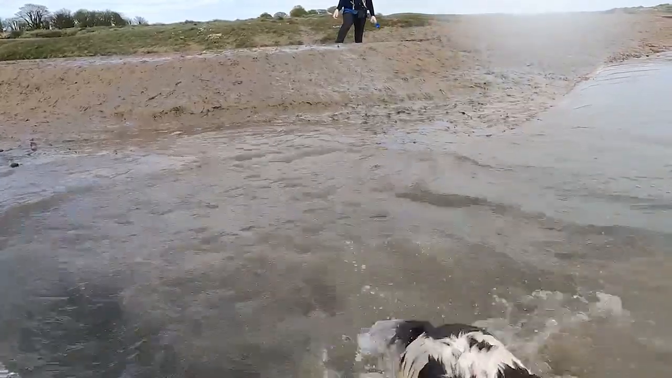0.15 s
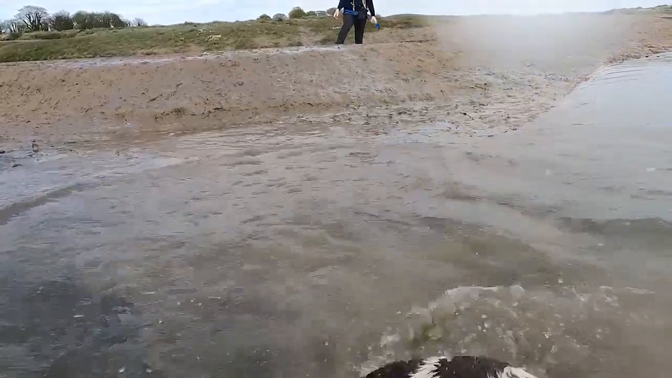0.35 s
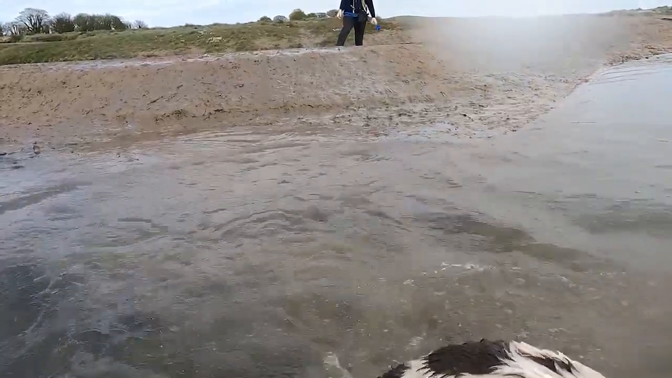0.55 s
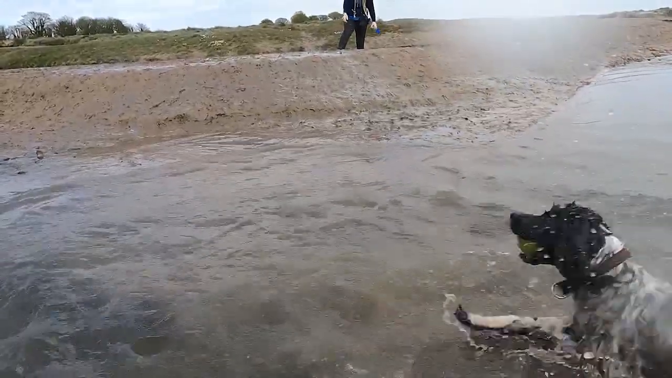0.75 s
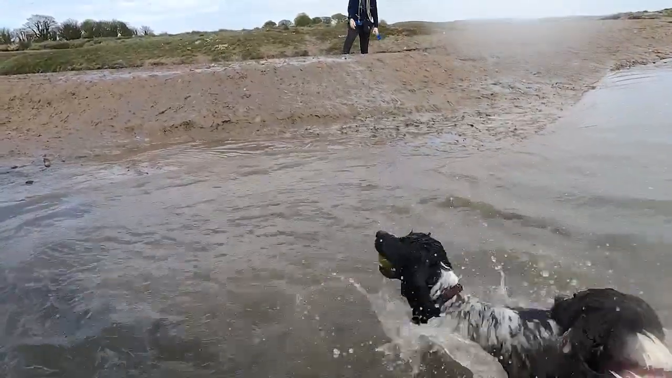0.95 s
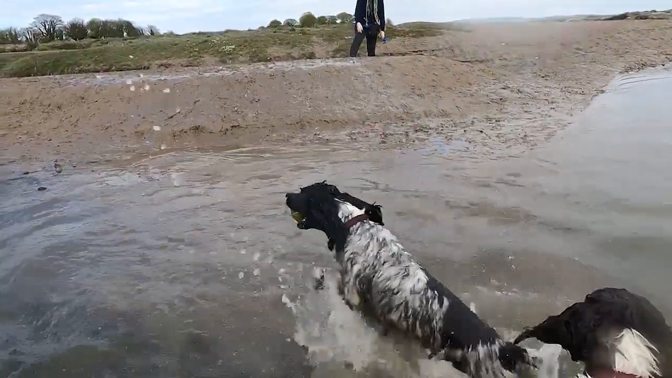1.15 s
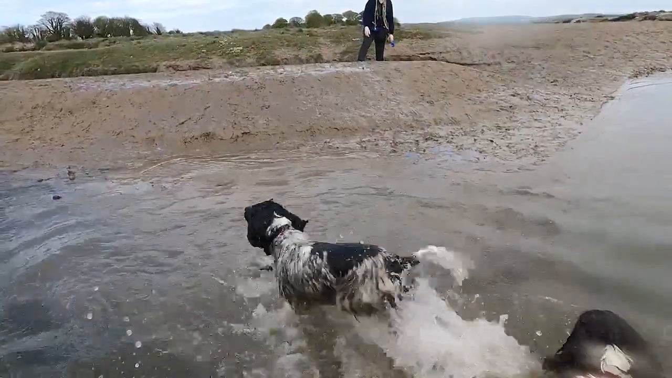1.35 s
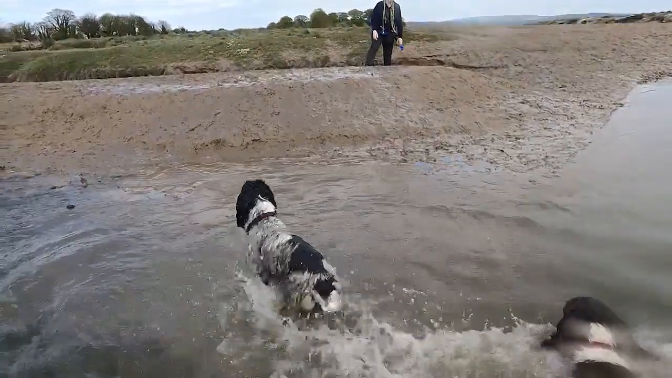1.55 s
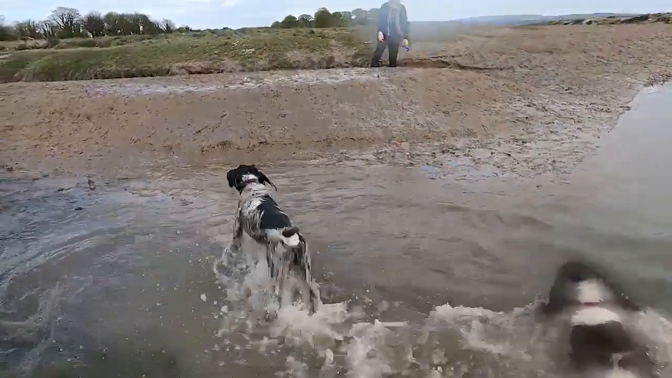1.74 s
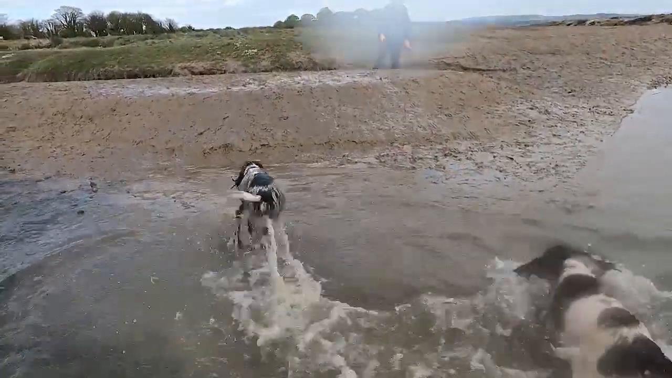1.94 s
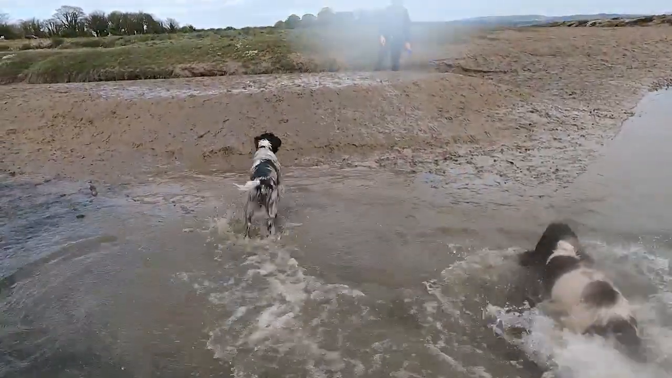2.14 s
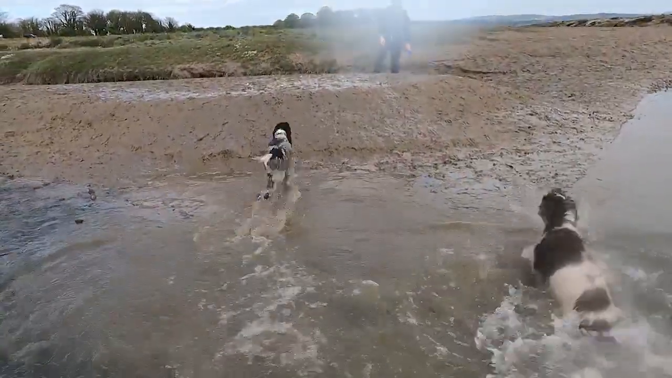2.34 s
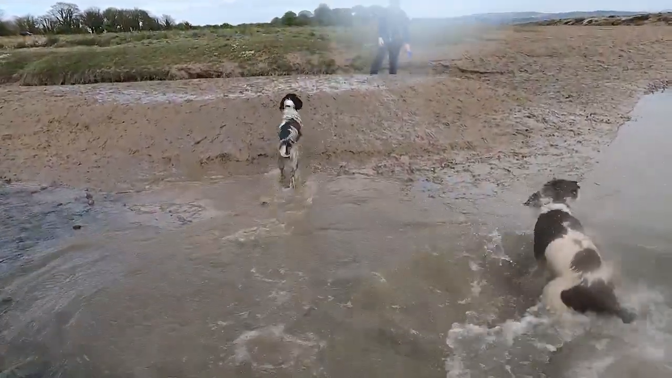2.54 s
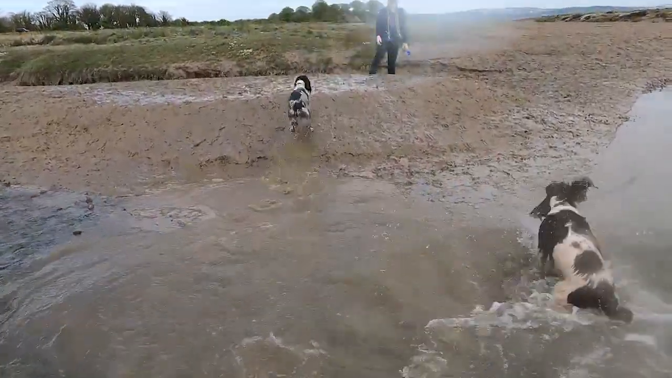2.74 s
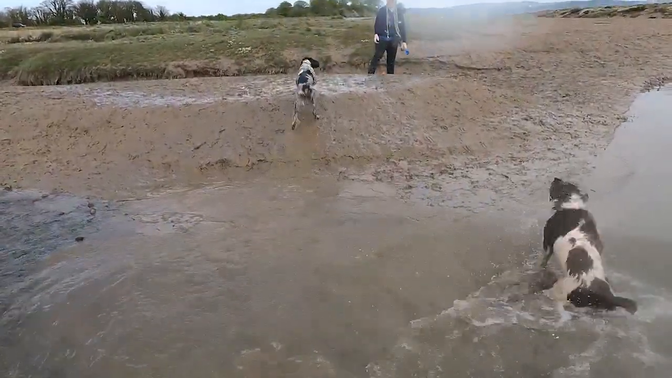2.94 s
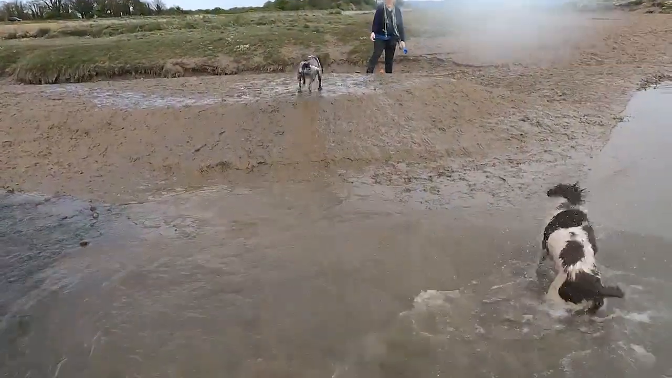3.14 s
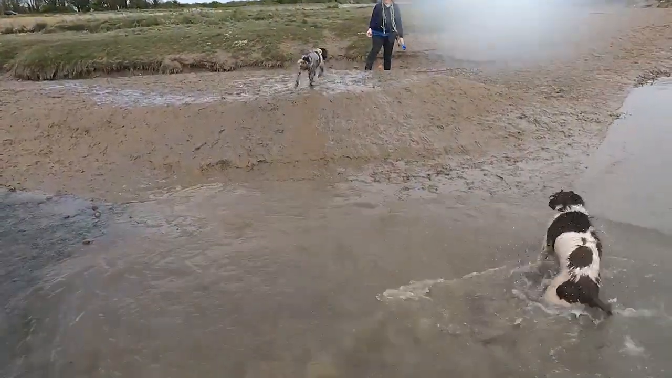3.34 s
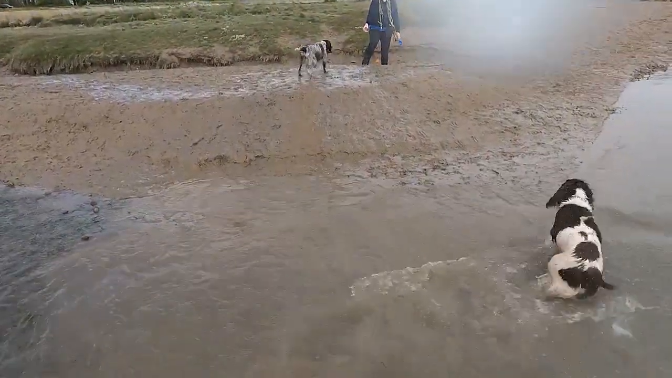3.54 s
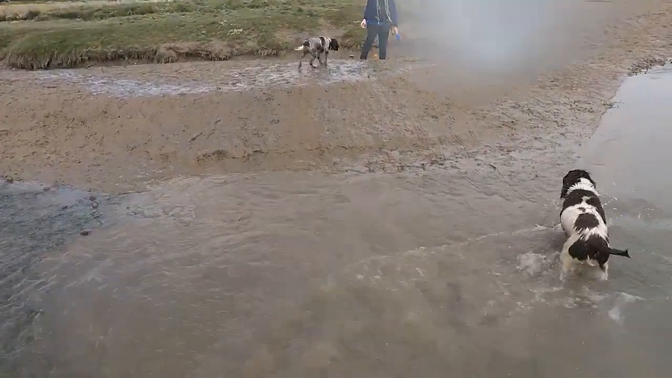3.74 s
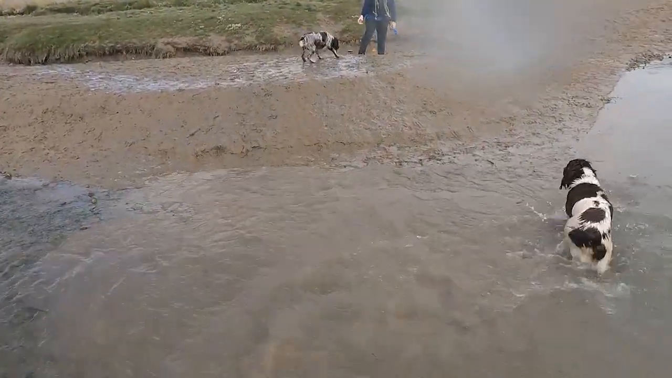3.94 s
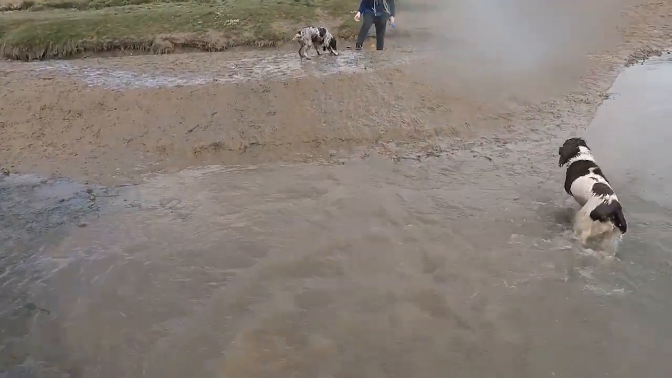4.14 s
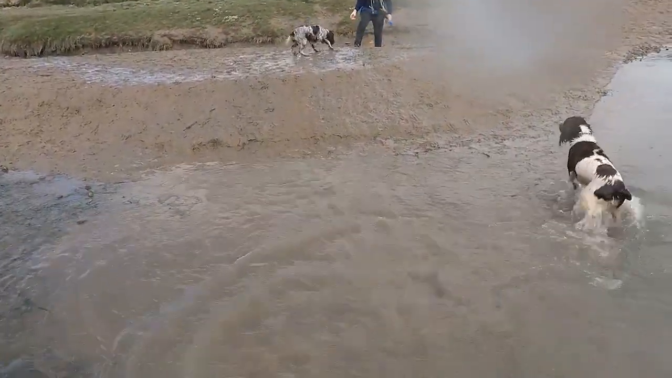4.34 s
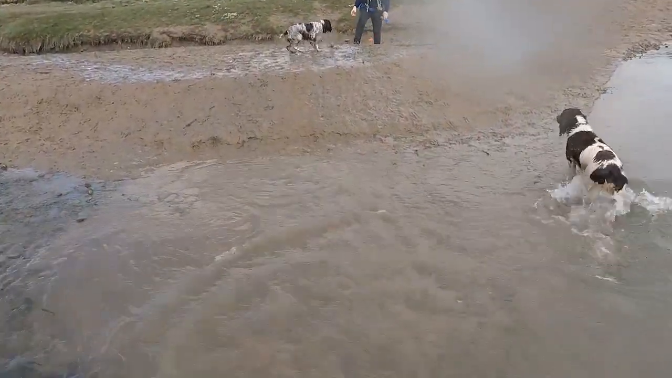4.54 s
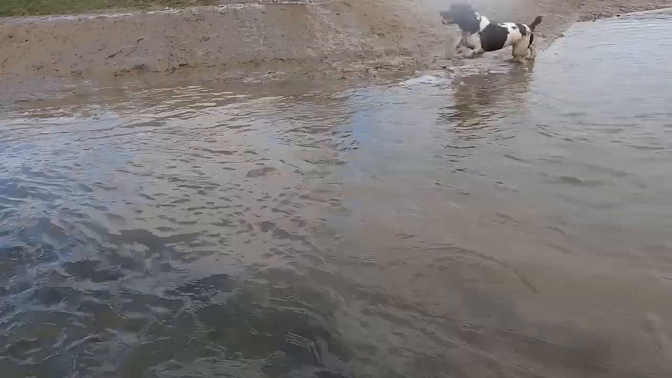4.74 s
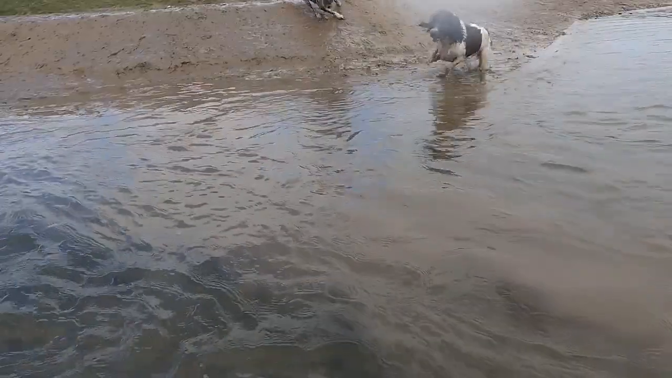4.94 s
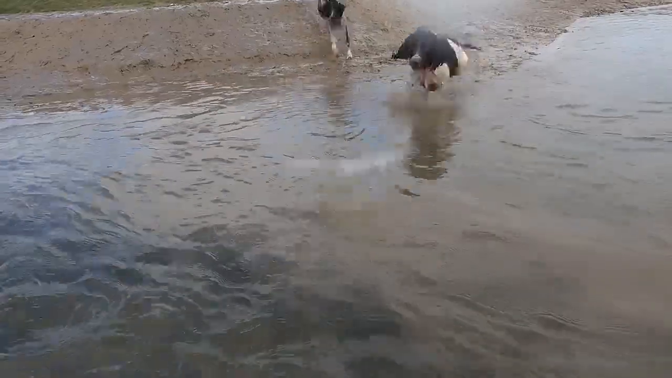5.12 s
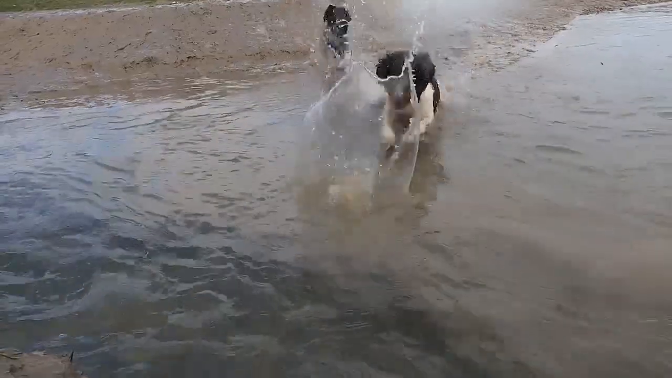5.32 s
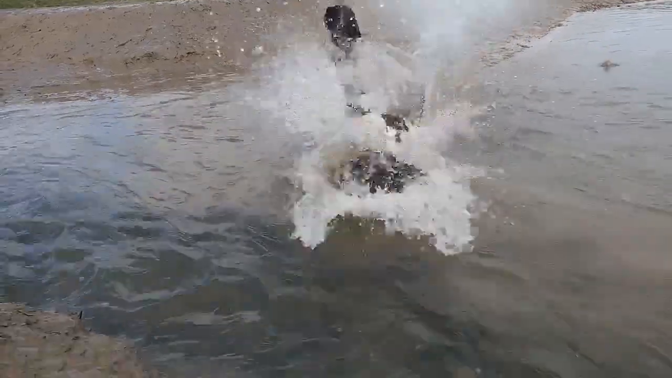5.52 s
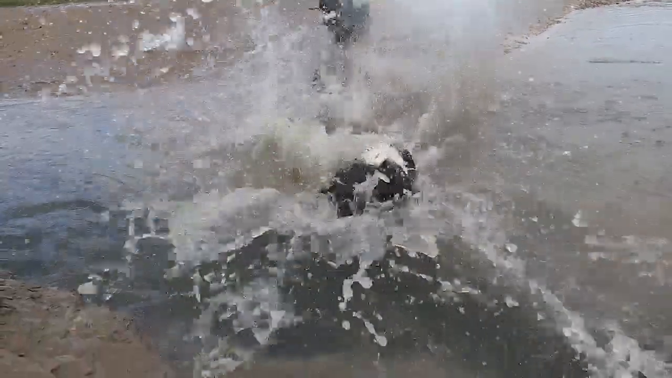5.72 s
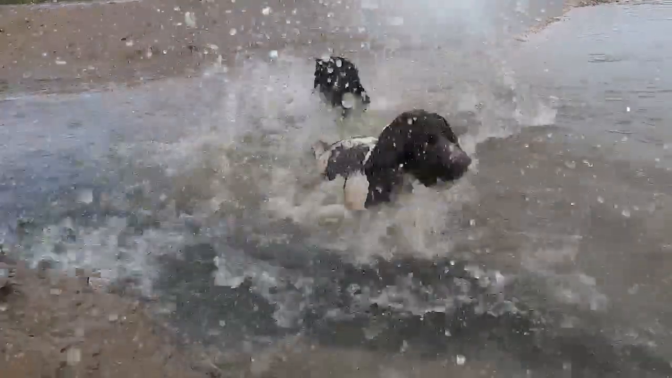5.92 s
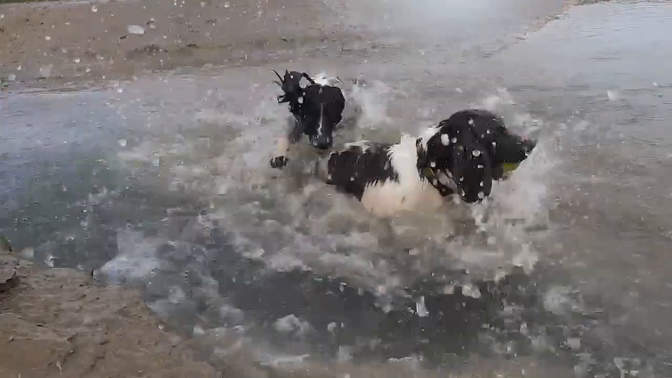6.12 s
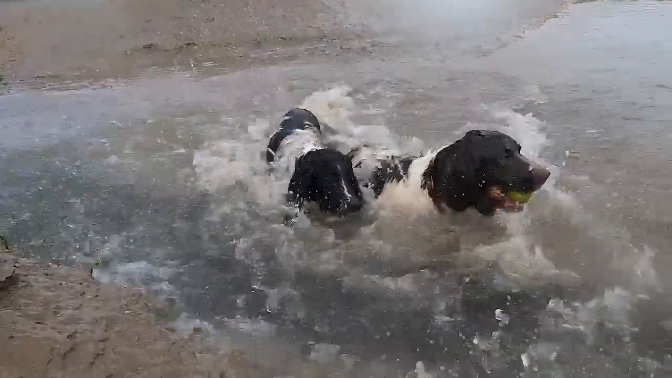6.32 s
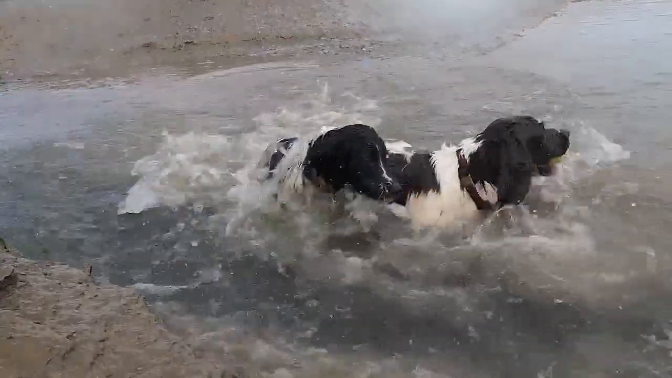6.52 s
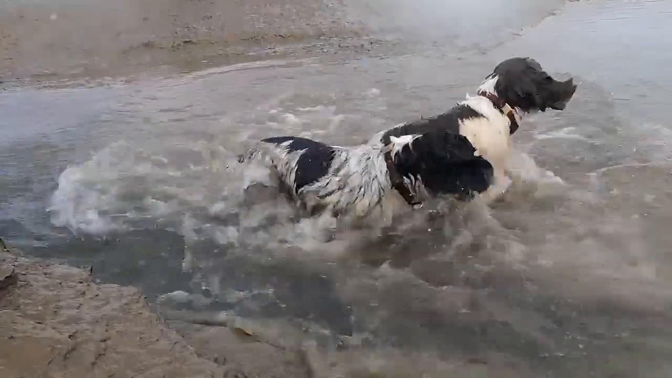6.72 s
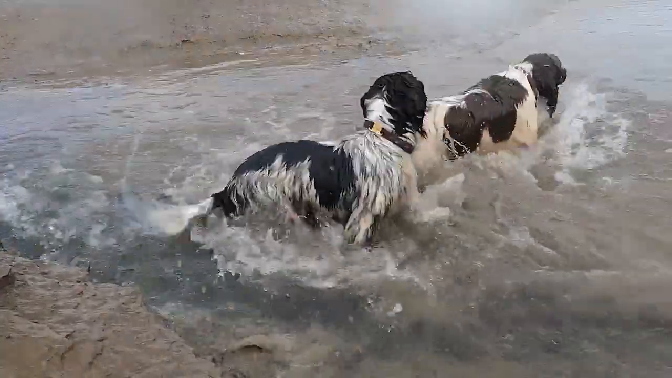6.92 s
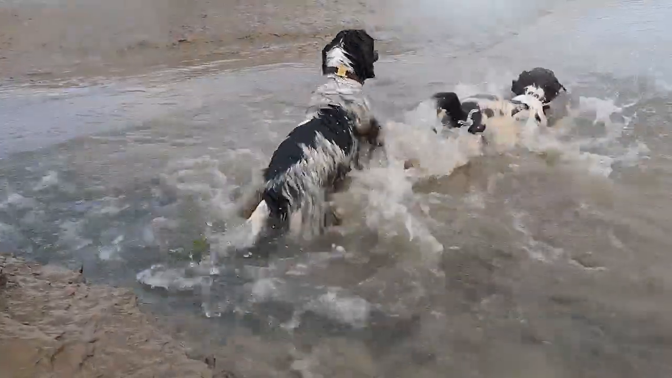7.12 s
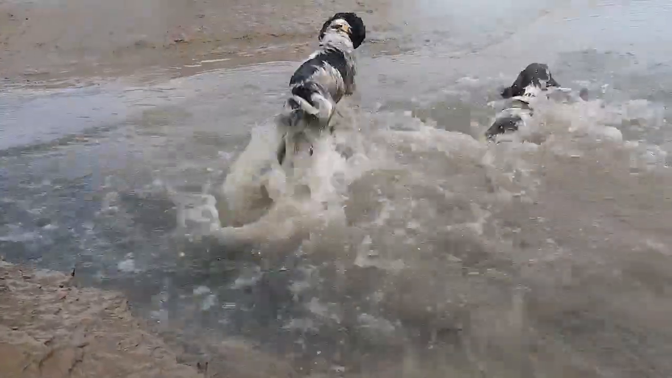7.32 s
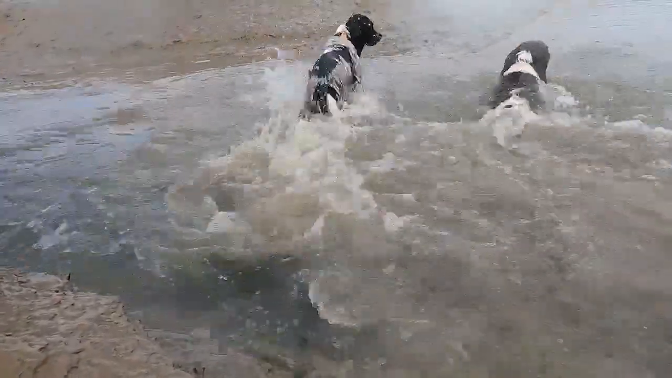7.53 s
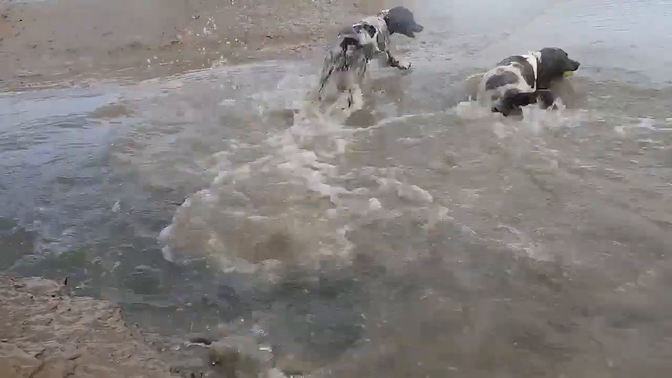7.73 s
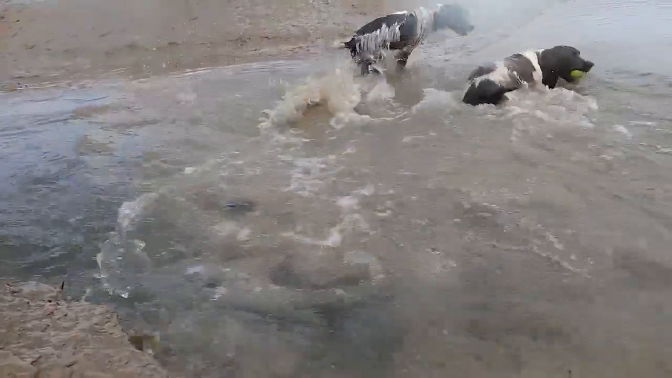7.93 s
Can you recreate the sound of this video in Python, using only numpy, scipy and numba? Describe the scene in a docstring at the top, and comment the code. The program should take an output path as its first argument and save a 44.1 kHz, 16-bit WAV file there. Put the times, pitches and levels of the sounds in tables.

```python
"""Two dogs splashing in muddy shallows

Two dogs bound and wade close by: a gurgling wash of air pockets, bubbles, drops, spray and mist,
each layer a swarm of decaying sines, lifted by lunges and throws. Loud lone bubbles and paw slaps
(crack, plink, droplets) sit on top; filtered noise makes the far lapping and a low hum beneath.
The sound breaks off briefly, then a dog gallops in from the bank and plunges."""
import sys
import numpy as np
from scipy import signal
from scipy.fft import rfft, irfft, next_fast_len
from scipy.io import wavfile
from scipy.ndimage import uniform_filter1d
from numba import njit

SR = 44100
rng = np.random.default_rng(int(sys.argv[2]) if len(sys.argv) > 2 else 0)


def dump(signal):
    """Clip the signal to [-1, 1] and save it as 16-bit WAV at the path in sys.argv[1]."""
    limited = np.clip(np.atleast_2d(signal).T, -1, 1)
    pcm = np.round(limited * 32767).astype(np.int16)
    wavfile.write(sys.argv[1], SR, pcm)


N = 351477


def from_db(db):
    """Decibels to gain."""
    return 10 ** (np.asarray(db) / 20)


def rms_one(x):
    """Scale to rms 1."""
    return x / np.sqrt(np.mean(x ** 2) + 1e-20)


def in_time(rows):
    """Automation curves: the columns of a table at every sample."""
    time_s, *columns = np.transpose(rows)
    return [np.interp(np.arange(N) / SR, time_s, column) for column in columns]


def drift(corner_hz):
    """Slow random modulation: noise through two equal one-pole low-passes, rms 1."""
    step = 40   # samples between drawn points
    pole = np.exp(-2 * np.pi * step * corner_hz / SR)
    noise = rng.standard_normal(N // step + 2002)
    slow = signal.lfilter([1], [1, -2 * pole, pole ** 2], noise)[2000:]   # skip the run-in
    return np.interp(np.arange(N) / step, np.arange(len(slow)), rms_one(slow))


def colour(x, points, low_hz=20, high_hz=20000, flatten=False):
    """EQ x along points between two soft edges; flatten first evens out its own spectrum."""
    size = next_fast_len(N)
    spectrum = rfft(x, size)
    hz = np.arange(size // 2 + 1) * SR / size + 1   # the 1 keeps the logarithm finite
    if flatten:
        power = uniform_filter1d(np.abs(spectrum) ** 2, size=801)
        spectrum = spectrum / np.sqrt(power + 1e-12)
    point_hz, point_db = np.transpose(points)
    gain = from_db(np.interp(np.log(hz), np.log(point_hz), point_db))
    edges = np.sqrt((1 + (low_hz / hz) ** 6) * (1 + (hz / high_hz) ** 6))
    return irfft(spectrum * gain / edges, size)[:N]


# Far lapping, spectrum before levelling: freq_hz, density_db (per Hz)
LAPPING_SPECTRUM = [(35, -37), (60, -14), (141, -6), (185, -7), (913, -16), (1370, -39), (4220, -12),
                    (13000, -33)]
HISS_DB = -51.5   # rms
HUM_HZ, HUM_WIDTH_HZ, HUM_DB = 132, 16, -58.5   # rms


def background():
    """Far lapping as soft shaped noise, and noise through a narrow resonance as a wavering hum."""
    radius = np.exp(-np.pi * HUM_WIDTH_HZ / SR)
    angle = 2 * np.pi * HUM_HZ / SR
    resonance = [1, -2 * radius * np.cos(angle), radius ** 2]
    hum = signal.lfilter([1, 0, -1], resonance, rng.standard_normal(N))
    hiss = colour(rng.standard_normal(N), LAPPING_SPECTRUM)
    return from_db(HUM_DB) * rms_one(hum) + from_db(HISS_DB) * rms_one(hiss)


@njit
def add(out, start, height, hz, cycles, rise, swell, sr):
    """Each bubble swells over some turns and dies in its cycles, rising in pitch near the surface."""
    for k in range(len(start)):
        period = sr / hz[k]
        for i in range(min(int(cycles[k] * period), len(out) - start[k])):
            turns = i / period
            age = turns / cycles[k]
            size = min(turns / swell[k], 1.0) * np.exp(-5 * age)
            phase = 2 * np.pi * turns * (1 + rise * age / 2)
            out[start[k] + i] += height[k] * size * np.sin(phase)
    return out


def births(per_s, spread_db, clump_db):
    """Random onsets with random sign, a few much louder; clump_db makes neighbours swell together."""
    start = np.flatnonzero(rng.random(N) < per_s / SR)
    size_db = spread_db * np.minimum(rng.exponential(1, len(start)), 4) + clump_db[start]
    return start, from_db(size_db) * rng.choice([-1., 1.], len(start))


# Water through the sealed microphone port, spectrum before levelling: freq_hz, density_db (per Hz)
WATER_SPECTRUM = [(29, -60), (50, -45.5), (178, -4.5), (313, -1.5), (551, 2), (650, -8), (1170, -6),
                  (2610, -7), (4080, -9.5), (7170, -21.5), (8260, -30), (9070, -39), (10200, -30),
                  (11000, -30.5), (13900, -51.5)]


def swarm(per_s, low_hz, high_hz, cycles, spread_db, clump_db, rise=0.458):
    """Bubbles spread evenly in log pitch over one size range, coloured by the water; rms 1."""
    start, height = births(per_s, spread_db, clump_db)
    pitch, life = rng.random((2, len(start)))
    hz = low_hz * 0.6877 * (2 * high_hz / low_hz) ** pitch   # spills past both edges
    rings = add(np.zeros(N), start, height, hz, cycles * (.5 + life), rise, np.ones(len(hz)), SR)
    return rms_one(colour(rings, WATER_SPECTRUM, low_hz, high_hz, flatten=True))


# Usual bubble pitch, higher in the shallows: time_s, pitch_hz
USUAL_PITCH = [(0, 730), (.8, 688), (1.4, 626), (2.85, 662), (3.1, 832), (3.9, 793), (4.6, 846),
               (4.75, 643), (5.05, 1000), (5.45, 960), (5.62, 644), (6.05, 657), (6.35, 810), (6.65, 629),
               (7.3, 690), (7.55, 810), (7.8, 650), (7.97, 750)]


def froth(per_s, octaves, cycles, spread_db, clump_db):
    """The gurgle: bubbles whose sizes gather round the usual one; rms 1."""
    usual_hz, = in_time(USUAL_PITCH)
    start, height = births(per_s, spread_db, clump_db)
    ratio = 2 ** (octaves * rng.standard_normal(len(start)))
    hz = usual_hz[start] * ratio
    lives = cycles * (.5 + rng.random(len(start)))
    return rms_one(add(np.zeros(N), start, height * np.sqrt(ratio), hz, lives, .1, 0.081 * lives, SR))


def bursts(rows, shape):
    """Power of two layers over time, one envelope per row."""
    power, age_s = np.zeros((2, N + SR)), np.arange(SR // 2) / SR
    for start_s, first_db, second_db, length_s in rows:
        at = int(start_s * SR)
        gains = from_db([[first_db], [second_db]])
        power[:, at:at + len(age_s)] += (gains * shape(age_s, length_s)) ** 2
    return power[:, :N]


# Steady wash round the dogs: time_s, bubbles_db, pockets_over_bubbles_db, spray_db
WASH_CURVES = [(0, -27.5, -7, -25.5), (.3, -26.5, -18, -31), (.7, -30, -17, -31), (.8, -24, -12.5, -26),
               (1.25, -23.5, -9, -29), (1.7, -24, -5, -26.5), (2.2, -25, -11.5, -29),
               (2.87, -30.5, -20, -31.5), (3.28, -39.5, -9, -36), (3.6, -37.5, -28, -39),
               (4.0, -30, -14, -35), (4.15, -29, -16, -36), (4.47, -32, -3, -36.5),
               (4.75, -32.5, -10, -33.5), (4.8, -60, -8, -53), (5.0, -65, 2, -67), (5.28, -53, -2, -50),
               (5.55, -38, -15, -30), (5.62, -25, 2, -28), (5.83, -29, 1, -26), (6.03, -25, -0.5, -21.5),
               (6.42, -28, -5.5, -24.5), (6.6, -29, -2, -33), (6.82, -27.5, -6, -33.5),
               (7.2, -22, -4.5, -27.5), (7.55, -23.5, -12, -29), (7.75, -25.5, -5, -32),
               (7.97, -26, -10, -30.5)]
MIST_DB, MIST_SWING = -40, 1.07   # wash mist when its spray is at -30.5 dB; dB of mist per dB of spray
DROPS_FROM_BUBBLES_DB, DROPS_FROM_SPRAY_DB = -4.5, -1.5


def churning():
    """Five bubble sizes; a shared surge swells them together, with faster patter on the small ones."""
    wash_db, depth_db, sheet_db = in_time(WASH_CURVES)
    pushed, trapped = bursts(LUNGE_EVENTS, lunge)
    thrown, misted = bursts(THROW_EVENTS, throw)

    # Layer gains: wash and bursts add as power
    bubbly = np.sqrt(from_db(wash_db) ** 2 + pushed)
    hollow = np.sqrt(from_db(wash_db + depth_db) ** 2 + trapped)
    sprayed = np.sqrt(from_db(sheet_db) ** 2 + thrown)
    mist_db = MIST_SWING * (sheet_db + 30.5) + MIST_DB
    misty = np.sqrt(from_db(mist_db) ** 2 + misted)
    dripping = np.hypot(from_db(DROPS_FROM_BUBBLES_DB) * bubbly, from_db(DROPS_FROM_SPRAY_DB) * sprayed)

    surge, patter = drift(19.5), drift(32)
    pockets = swarm(400, 77.7, 418, 6.4, 2.2, 0.79 * surge + 1.24 * drift(11))
    bubbles = froth(700, 0.342, 16.4, 2.16, 1.33 * surge + 0.97 * drift(38))
    drops = swarm(1100, 1057.5, 2320, 22.5, 0.56, 0.35 * surge + 0.24 * patter)
    spray = swarm(2800, 2321, 5420, 22.9, 0.56, 0.35 * surge + 1.3 * patter)
    mist = swarm(8000, 5350, 15700, 5.8, 1.2, 0.48 * surge + 1.8 * patter)
    return hollow * pockets + bubbly * bubbles + dripping * drops + sprayed * spray + misty * mist


# Legs and chest lunge through the water: start_s, bubbles_db, pockets_db, length_s
LUNGE_EVENTS = [(.04, -29, -31.5, 0.11), (.19, -26.5, -33, 0.069), (.4, -29.5, -30.5, 0.22),
                (.77, -23, -28, 0.072), (.94, -24, -29.5, 0.1), (1.06, -24.5, -24, 0.12),
                (1.27, -29, -27, 0.094), (1.5, -25.5, -26, 0.089), (1.66, -27, -27.5, 0.15),
                (2.1, -24.5, -35, .15), (2.36, -27, -43, 0.044), (2.5, -32.5, -48, 0.05),
                (2.71, -31.5, -46, 0.11), (2.97, -32.5, -37.5, 0.072), (3.39, -31.5, -38, .04),
                (3.435, -28, -35.5, 0.053), (3.68, -38, -51, 0.029), (3.8, -29, -46, 0.097),
                (3.9, -24.5, -37.5, 0.19), (4.19, -29, -57, 0.097), (4.35, -26.5, -41, 0.07),
                (4.5, -31, -37.5, .06), (4.59, -27, -35, 0.07), (4.7, -32.5, -52, 0.064),
                (5.29, -34.5, -30, 0.046), (5.38, -34.5, -39, 0.15), (5.64, -27.5, -26, 0.14),
                (6.07, -38, -34, 0.029), (6.48, -26, -24.5, 0.092), (6.66, -33, -33, 0.062),
                (6.88, -27.5, -38, 0.11), (7.17, -31, -30, 0.11), (7.43, -23.5, -37, 0.16),
                (7.7, -36, -30.5, 0.036), (7.785, -35, -23.5, 0.025), (7.86, -25, -30, .04)]
LUNGE_RISE_S, LUNGE_FALL_S = 0.023, 0.02


def lunge(age_s, length_s):
    """Envelope of water pushed aside: swell, hold to length_s, sink."""
    sinking_s = np.maximum(age_s - length_s, 0)
    return np.minimum(age_s / LUNGE_RISE_S, 1) * np.exp(-sinking_s / LUNGE_FALL_S)


# Single loud bubbles and air pockets: start_s, level_db, pitch_hz, length_ms
BUBBLE_EVENTS = [(0.207, -12.5, 360, 20), (0.395, -15, 525, 25), (0.407, -14, 360, 20),
                 (0.437, -10, 637, 26), (0.457, -16.5, 416, 24), (0.783, -19, 290, 21),
                 (0.821, -9, 678, 26), (0.852, -11, 720, 13), (0.955, -19, 118, 35), (1.046, -9, 597, 12),
                 (1.103, -14.5, 181, 41), (1.135, -24, 95, 24), (1.157, -13.5, 1290, 16),
                 (1.285, -16.5, 256, 14), (1.308, -18, 882, 15), (1.56, -13, 273, 10), (1.693, -8, 570, 13),
                 (1.719, -20, 289, 49), (2.221, -19.5, 202, 21), (2.805, -11.5, 1340, 6.2),
                 (2.961, -9, 1160, 4.3), (3.032, -24, 930, 14), (3.518, -18, 875, 11),
                 (3.802, -12.5, 870, 13), (3.837, -13.5, 830, 29), (3.846, -18.5, 533, 20),
                 (3.912, -19, 559, 19), (4.232, -12.5, 726, 27), (4.368, -14.5, 910, 13),
                 (4.528, -11.5, 850, 7.8), (4.604, -15, 550, 8.8), (4.637, -19, 314, 12),
                 (4.648, -15, 1000, 9.3), (4.727, -16, 530, 20), (5.294, -22, 765, 14),
                 (5.323, -16, 1070, 9), (5.6, -13.5, 574, 22), (5.635, -17, 577, 12), (5.635, -15, 930, 12),
                 (5.657, -10.5, 169, 26), (5.687, -7, 1210, 16.5), (5.731, -10, 282, 11),
                 (5.762, -13.5, 388, 37), (5.97, -13, 910, 20), (6.093, -14, 189, 11),
                 (6.479, -11, 608, 13), (6.529, -18, 183, 20), (6.536, -4, 938, 7.7), (6.696, -13, 605, 15),
                 (6.908, -15, 850, 12), (6.925, -14, 480, 20), (7.01, -14, 640, 24),
                 (7.787, -13.5, 266, 20), (7.871, -17, 423, 24)]


def lone_bubbles():
    """Each neck pinches off over a third of the length; then the bubble rings out, rising slightly."""
    start_s, level_db, pitch_hz, length_ms = np.transpose(BUBBLE_EVENTS)
    start = (start_s * SR).astype(np.int64)
    turns = length_ms * pitch_hz / 1000
    height = from_db(level_db + 4.5)   # makes up for decay during the swell
    return add(np.zeros(N), start, height, pitch_hz, 2.27 * turns, .12, 0.34 * turns, SR)


# Paw slaps and flung drops: start_s, level_db (each part is offset from it), pitch_hz
SLAP_EVENTS = [(0.2099, -11.5, 2050), (0.3067, -13, 1850), (0.3715, -11.5, 1800), (0.4974, -9.5, 2290),
               (0.621, -15, 1950), (0.7448, -9.5, 1440), (0.9102, -9, 1700), (0.9578, -4, 3000),
               (1.336, -7, 2630), (1.3929, -3.5, 2500), (1.4968, -14, 1650), (2.146, -15, 1770),
               (2.211, -17, 2680), (2.3441, -15, 1980), (2.5497, -12, 2490), (2.7794, -7.5, 1880),
               (2.793, -11, 1790), (2.856, -10, 2770), (2.9547, -9.5, 2570), (3.1155, -15.5, 3650),
               (3.1949, -11, 2440), (3.399, -13, 2050), (3.4433, -16, 3080), (3.477, -9.5, 4200),
               (3.5212, -17, 1480), (3.7665, -20, 3240), (3.788, -16, 1480), (3.823, -19, 2680),
               (4.0772, -8, 1400), (4.37, -15, 1690), (4.3835, -15, 1850), (4.555, -18, 1520),
               (4.7964, -22, 5500), (4.8393, -25, 1860), (4.893, -23, 2130), (4.9555, -33, 4290),
               (5.012, -17.5, 1920), (5.0293, -16, 4090), (5.0473, -7.5, 3260), (5.0694, -16, 4280),
               (5.1392, -17.5, 4500), (5.1475, -15.5, 2430), (5.174, -23, 3390), (5.197, -21, 4960),
               (5.236, -14.5, 3560), (5.2629, -32, 2550), (5.2937, -14, 4560), (5.308, -6, 3720),
               (5.326, -5.5, 3600), (5.3887, -6, 2270), (5.4006, -6, 1850), (5.4779, -11.5, 1410),
               (5.5698, -6, 2250), (5.6381, -6, 1390), (5.66, -11, 2300), (5.89, -8.5, 3420),
               (6.2248, -21, 1870), (6.2718, -10, 1750), (6.329, -1, 3500), (6.389, -2.5, 3750),
               (6.42, -2.5, 1620), (6.512, -12, 3320), (6.9121, -15, 1520), (6.9697, -8, 2030),
               (7.1534, -4.5, 2400), (7.322, -14, 2430), (7.645, -11, 1310), (7.6858, -7, 2440)]
SLAP_MS, SLAP_RISE_MS = 5.1, 0.83   # decay constant and attack of the droplets


def slaps():
    """A short crack at the contact, a plink, and a burst of droplets dying away."""
    start_s, level_db, pitch_hz = np.transpose(SLAP_EVENTS)
    start = (start_s * SR).astype(np.int64)
    burst, age_ms = np.zeros(N + SR // 8), np.arange(SR // 8) / SR * 1000
    shape = np.minimum(age_ms / SLAP_RISE_MS, 1) * np.exp(-age_ms / SLAP_MS)
    for at, slap_db in zip(start, level_db):
        burst[at:at + len(shape)] += from_db(slap_db - 8.5) * shape
    droplets = burst[:N] * swarm(5000, 732, 12000, 3.6, 2.2, np.zeros(N))

    quick = np.full(len(pitch_hz), .3)   # turns of swell
    crack_cycles = 3 + 0 * pitch_hz
    plink_cycles = 1.8 * SLAP_MS * pitch_hz / 1000
    cracked = add(droplets, start, from_db(level_db + 1), pitch_hz, crack_cycles, 0., quick, SR)
    return add(cracked, start, from_db(level_db - 4), pitch_hz, plink_cycles, .1, 3 * quick, SR)


# Paws break the surface and throw spray: start_s, spray_db, mist_db, fall_s
THROW_EVENTS = [(.24, -29.5, -34, 0.26), (.38, -26, -37, 0.053), (.62, -26, -29.5, 0.082),
                (.75, -27, -33, .1), (.92, -23, -28, .06), (1.3, -27, -34, 0.43), (1.6, -23, -28.5, 0.062),
                (2.1, -25, -44, 0.069), (2.38, -23, -46, 0.037), (2.6, -25.5, -39, .05),
                (3.01, -29, -36, 0.032), (3.1, -41, -37, 0.054), (3.29, -31, -41, 0.075),
                (3.45, -30.5, -40, 0.13), (4.05, -41, -42, 0.046), (4.37, -36, -38.5, 0.12),
                (4.6, -30, -51, 0.12), (4.795, -48, -46, .03), (4.875, -34, -38, 0.016),
                (5.02, -36.5, -35.5, 0.12), (5.135, -27.5, -31, 0.023), (5.19, -36, -39, 0.037),
                (5.225, -33, -31, 0.022), (5.29, -25.5, -25.5, 0.046), (5.375, -27, -38, 0.084),
                (5.555, -22.5, -42, 0.093), (5.68, -20.5, -28, .06), (5.92, -23.5, -31, 0.13),
                (6.17, -39, -24, 0.066), (6.28, -37, -26, 0.12), (6.37, -26, -22, 0.063),
                (6.47, -28, -36, .05), (6.52, -36, -38, 0.03), (6.68, -35, -35, 0.068),
                (6.92, -30, -46, 0.12), (7.12, -25, -35, 0.05), (7.47, -25.5, -49, 0.17),
                (7.63, -28, -50, 0.076)]
THROW_RISE_S = 0.0066


def throw(age_s, fall_s):
    """Envelope of flung spray: quick rise, then the spray falls back."""
    return np.minimum(age_s / THROW_RISE_S, 1) * np.exp(-age_s / fall_s)


# Stereo width, EQ of the side signal: freq_hz, side_over_mid_db
WIDTH_EQ = [(60, -32), (800, -50), (4000, -33), (8800, -22), (11800, -1)]


def scene():
    """Everything in the middle; mainly the top treble differs left and right."""
    mid = churning() + slaps() + lone_bubbles() + background()
    side = colour(mid * drift(200), WIDTH_EQ)   # random modulation decorrelates it from the mid
    return np.array([mid + side, mid - side])


PORT_NOTCH_HZ, PORT_NOTCH_Q = 9100, 19
LOW_CUT_HZ, RUMBLE_HZ, RUMBLE_DB = 62, 60, -82
BREAK_START_S, BREAK_END_S = 4.755, 4.795
CUTOFF_HZ = 14150   # 60 dB down from here up
CEILING = 0.79   # soft limit of the peaks


def record(dry):
    """The port cancels one treble band and cuts the bass, peaks are rounded, the sound breaks off once."""
    ported = signal.lfilter(*signal.iirnotch(PORT_NOTCH_HZ, PORT_NOTCH_Q, SR), dry)
    ported = signal.sosfilt(signal.butter(2, LOW_CUT_HZ, "high", fs=SR, output="sos"), ported)
    low_pass = signal.butter(2, RUMBLE_HZ, fs=SR, output="sos")
    rumble = rms_one(signal.sosfilt(low_pass, rng.standard_normal(N)))   # air on the port
    rounded = CEILING * np.tanh((ported + from_db(RUMBLE_DB) * rumble) / CEILING)
    t = np.arange(N) / SR
    running = (t < BREAK_START_S) | (t > BREAK_END_S)
    return signal.sosfilt(signal.cheby2(20, 60, CUTOFF_HZ, fs=SR, output="sos"), rounded * running)


dry = scene()
out = record(dry)
dump(out)
```